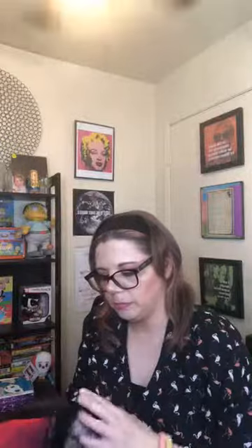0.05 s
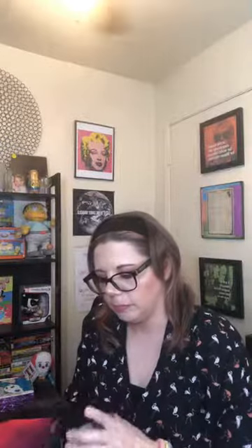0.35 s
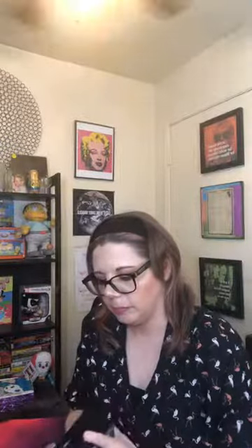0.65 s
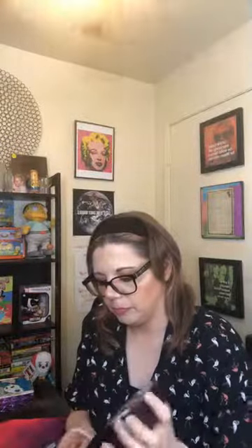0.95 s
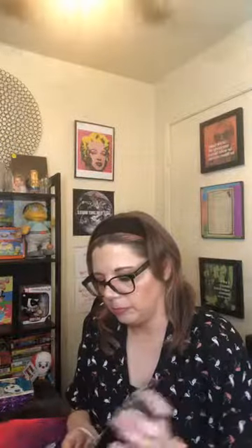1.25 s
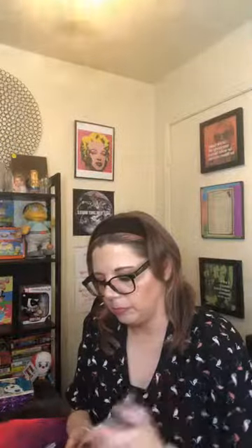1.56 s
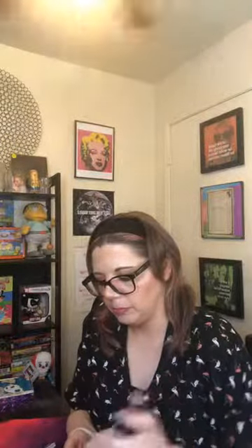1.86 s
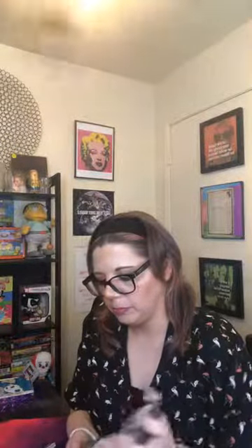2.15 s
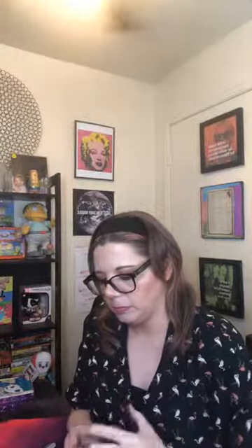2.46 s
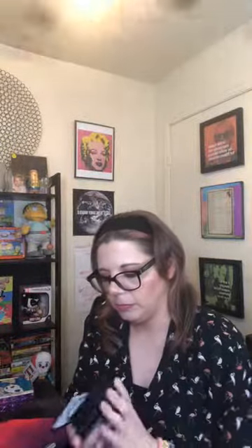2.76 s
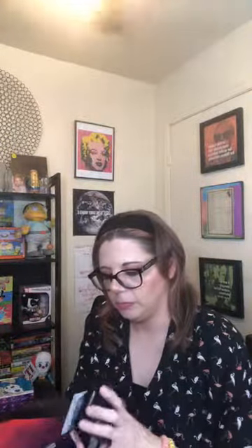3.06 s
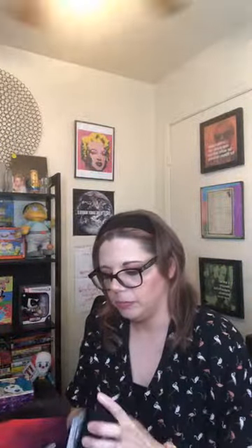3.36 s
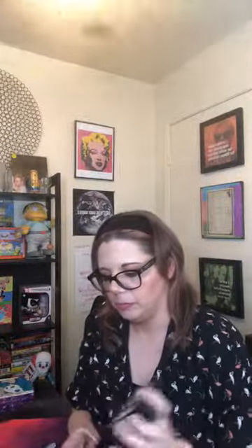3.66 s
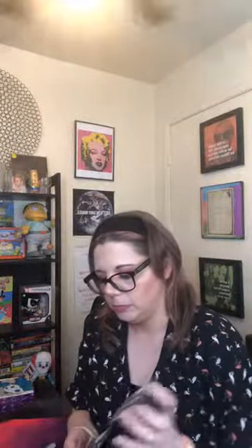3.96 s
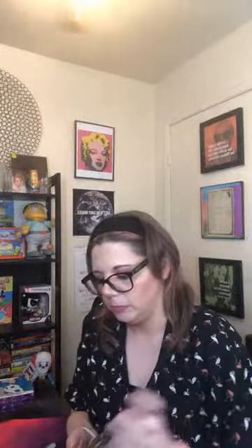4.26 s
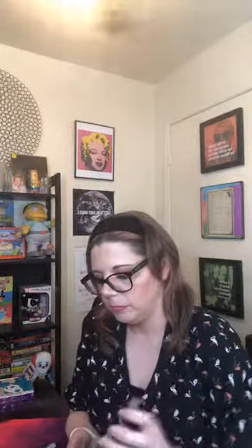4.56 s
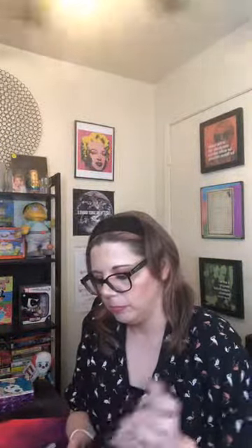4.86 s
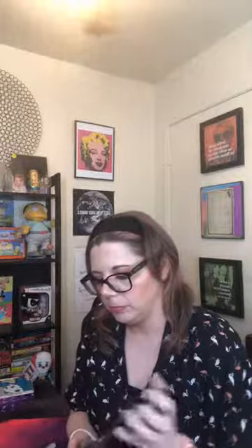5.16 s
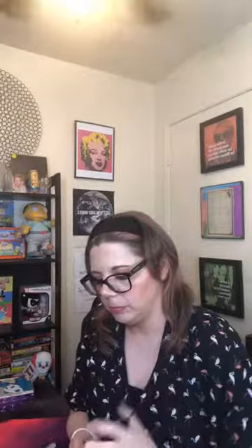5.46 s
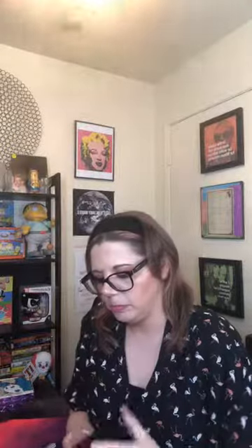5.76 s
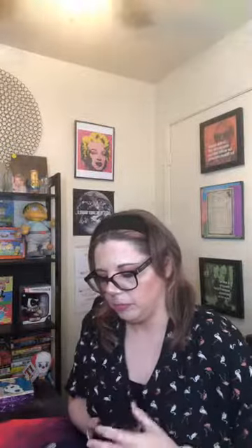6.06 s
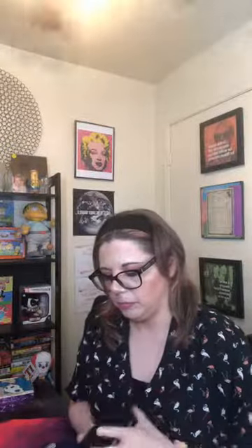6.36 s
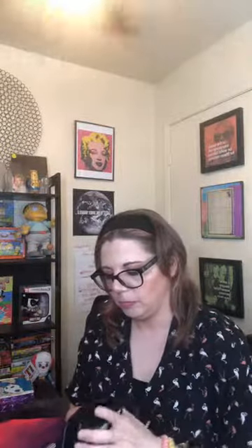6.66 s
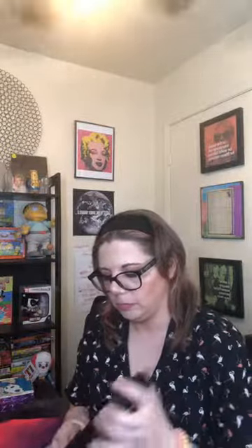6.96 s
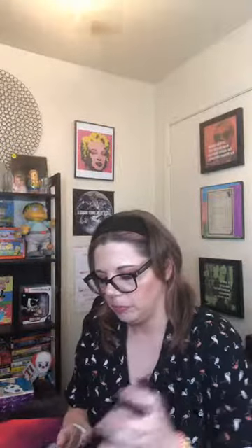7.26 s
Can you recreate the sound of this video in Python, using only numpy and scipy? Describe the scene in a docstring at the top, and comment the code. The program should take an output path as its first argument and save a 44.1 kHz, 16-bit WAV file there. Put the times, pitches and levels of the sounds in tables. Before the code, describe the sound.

A deck of cards is shuffled overhand about an arm's length from the microphone, in a small room with a brief echo. A fan gives a steady low hum and soft rush of air throughout. For the first second, fingers rub the cards with faint ticks. From 1.1 to 2.1 seconds, five packets land about a quarter second apart, each a papery patter and dry slap; the last is loudest, with a dull knock against the palm. Quiet sliding and rasping follow until 3.6 seconds. A second run of six drops starts softly at 3.8 seconds and builds to a firm slap just after 5 seconds. Light, sharp ticks and short hissing slides follow until about 5.7 seconds. Faint rubbing continues from 6 to 7 seconds, with a soft knock at 6.4. One more packet lands with a crisp crack at about 7.2 seconds.

```python
"""A deck of tarot cards, shuffled overhand in a small room, an arm's length from a phone microphone.
Each packet patters onto the deck, squares up with a slap, and the hand draws the other cards away.
Between the runs, cards are pushed straight and fingered: edges rasp, faces hiss, corners tick.
Desk and shelves colour the sound, the walls answer briefly, and a fan hums throughout."""
import sys
import numpy as np
from scipy import signal
from scipy.fft import rfft, irfft
from scipy.io import wavfile

SR = 44100
rng = np.random.default_rng(int(sys.argv[2]) if len(sys.argv) > 2 else 0)


def dump_mix(stems):
    """Bounce the given channels to the path in sys.argv[1] as a 16-bit WAV at rate SR."""
    frames = np.atleast_2d(stems).T  # one column per channel
    limited = np.clip(frames, -1, 1)  # hard clip at full scale
    pcm = np.round(limited * 32767).astype(np.int16)
    wavfile.write(sys.argv[1], SR, pcm)


N = 322371
T = np.arange(N) / SR

# packets dropped on the deck: (slap time [s], first touch ahead of it [s], patter level [dB],
# slap level [dB], deck pitch [Hz], hardness [dB], level of the draw that follows [dB])
PACKET_DROPS = [(1.106, 0.0085, -32, -20.5, 1290, 5, -68), (1.364, 0.0013, -26.5, -19, 1470, -5, -56),
                (1.621, 0.021, -35, -23.5, 1605, -11.5, -50), (1.8595, .0118, -34, -21, 1700, -2, -66),
                (2.0918, 0.0022, -37, -15, 1640, 0, -52), (3.7789, 0.0055, -32.5, -44, 1380, -7, -59),
                (4.0789, .005, -32.5, -32, 1740, 4, -56.5), (4.347, .0058, -31, -24.5, 1330, -14, -73),
                (4.595, 0.0069, -31, -24, 1630, -5.5, -57), (4.8446, .0067, -34, -21.5, 1590, -6.5, -49),
                (5.0613, 0.0034, -30.5, -17, 1650, 0, -53), (7.2489, .0155, -32, -27, 1570, 18, -54)]
# single cards snapping off a finger: (time [s], level [dB], hardness [dB])
CARD_SNAPS = [(.096, -49.5, 16), (0.155, -49.5, 14), (0.893, -46.5, -1), (1.133, -34.5, -1),
              (1.414, -34, -19), (2.011, -46, 1), (2.049, -36, -3), (2.319, -47.5, 0), (2.344, -44, -12),
              (3.518, -46.5, -5), (3.8104, -33.5, -2), (3.877, -44, 5), (4.668, -35.5, 5),
              (5.031, -42.5, 9), (5.262, -32, 23), (5.316, -38.5, 24), (5.41, -38, 11), (5.457, -43.5, 20),
              (6.405, -43, 3), (7.16, -51, 16)]


def undb(db):
    """Decibels to gain."""
    return 10 ** (np.asarray(db) / 20)


def unit(x):
    """Scale to unit energy."""
    return x / np.sqrt(np.sum(x ** 2) + 1e-18)


def at_level(x, db):
    """Scale a short sound to a level taken over three milliseconds."""
    return unit(x) * undb(db) * np.sqrt(.003 * SR)


def add(out, s, x):
    """Mix x into out from time s."""
    i = max(int(s * SR), 0)
    out[i:i + len(x)] += x[:max(N - i, 0)]


def gain_at(outline, hz):
    """Gain of a (frequency [Hz], level [dB]) outline on a log-frequency axis."""
    f, db = np.transpose(outline)
    return undb(np.interp(np.log(hz + 1), np.log(f), db))


def colour(x, outline, size=512):
    """Pass x through a minimum-phase filter of unit energy with the given outline."""
    cepstrum = irfft(np.log(gain_at(outline, np.fft.rfftfreq(size, 1 / SR))))
    cepstrum[1:size // 2] *= 2
    cepstrum[size // 2 + 1:] = 0
    impulse = unit(irfft(np.exp(rfft(cepstrum))))
    return signal.fftconvolve(x, impulse)[:len(x)]


def resonate(x, peaks):
    """Lift or dip a sound around resonances, each ringing on after a blow."""
    hz = np.fft.rfftfreq(N, 1 / SR)
    lift_db = sum(db / (1 + 2j * (hz - f) / width) for f, width, db in peaks)
    return irfft(rfft(x) * undb(lift_db), N)


def grains(rate, spread_db):
    """Tiny contacts of uneven size, rate per second; rms 1."""
    size = undb(spread_db * np.minimum(rng.exponential(size=N), 4))
    touches = rng.random(N) < rate / SR
    return unit(touches * size * rng.choice([-1, 1], N)) * np.sqrt(N)


def wander(rate):
    """Random drift with a spread near 1, taking rate steps per second."""
    steps = rng.standard_normal(4096)
    return np.interp(T * rate, np.arange(len(steps)), steps)


def ring(t, hz, t60):
    """One damped mode."""
    return np.sin(2 * np.pi * hz * t) * np.exp(-np.log(1000) * t / t60)


def leak(power, seconds):
    """Stored energy leaks away exponentially."""
    keep = np.exp(-1 / (seconds * SR))
    return signal.lfilter([1 - keep], [1, -keep], power)


def fan():
    """Room tone: a fan's moving air, lifted by resonances, and its faint wavering motor tones."""
    # air noise: (frequency [Hz], density [dB per Hz])
    air_spectrum = [(18, -99), (29, -71.5), (60, -64), (110, -68.5), (220, -68), (310, -75.5), (620, -88),
                    (850, -90.5), (1900, -99), (2400, -103), (4200, -104), (6000, -114), (8500, -115),
                    (10500, -124)]
    # resonances in the air noise: (frequency [Hz], width [Hz], lift [dB])
    booms = [(47.7, 5.8, 10.5), (216.5, 24, 4), (353.7, 21, 9), (559.5, 35, 7.5), (2080, 440, 3.5),
             (8600, 650, 5)]
    # motor tones: (frequency [Hz], rms level [dB])
    motor_tones = [(115.5, -56.5), (145, -65), (211, -61.5)]
    air_gain = gain_at(air_spectrum, np.fft.rfftfreq(N, 1 / SR))
    air = irfft(rfft(rng.standard_normal(N)) * air_gain, N) * np.sqrt(SR / 2)
    hum = np.zeros(N)
    for hz, db in motor_tones:
        amplitude = np.sqrt(2) * undb(db + 2 * wander(4.1))
        hum += amplitude * np.sin(2 * np.pi * hz * T + .5 * wander(2.53))
    return resonate(air, booms) * undb(1.06 * wander(4.34)) + hum


def fingering():
    """Rasp power of the fingers shifting on the deck between the runs."""
    # spells of rubbing: (start [s], end [s], level [dB])
    rubs = [(0.04, .75, -71), (2.6, 3.33, -74.5), (6.248, 6.85, -69)]
    return sum(undb(db) ** 2 * ((T > start) & (T < end)) for start, end, db in rubs)


def strokes(swell_share=0.63, draw_after_s=0.054, draw_s=.11, draw_hiss_db=-4,
            skid_s=0.038, skid_db=-12.5, skid_hiss_db=-8):
    """Pushes, draws and skids as (start [s], fastest [s], end [s], level [dB], hiss offset [dB])."""
    # cards pushed over each other: (fastest moment [s], length [s], level [dB], hiss offset [dB])
    pushes = [(0.091, 0.048, -50, -8.5), (0.391, 0.053, -54.5, -3), (0.833, 0.19, -56, -3.5),
              (1.473, 0.061, -52.5, -0.5), (1.963, .09, -57.5, 0), (2.057, 0.14, -44, -11),
              (2.368, 0.078, -44.5, -8), (2.592, 0.095, -54.5, -14), (2.773, 0.1, -54.5, -12.5),
              (2.946, 0.14, -60.5, -14), (3.04, 0.073, -56, -5), (3.269, 0.073, -57, -19),
              (3.485, 0.18, -54.5, -3.5), (3.526, 0.064, -51.5, -19), (3.885, .04, -60, 6.5),
              (4.486, 0.14, -59, -8), (4.566, 0.09, -60, -2), (4.953, 0.051, -46, -1),
              (5.184, 0.085, -48.5, -8), (5.354, .14, -47, -6.5), (5.571, 0.095, -46.5, -6.5),
              (5.642, 0.1, -50.5, -10.5), (6.06, 0.23, -55.5, -9), (6.172, .1, -51.5, -4),
              (6.947, 0.27, -58.5, -5)]
    draws = [(hit + draw_after_s, draw_s, db, draw_hiss_db) for hit, *_, db in PACKET_DROPS]
    swells = [(s - swell_share * length, s, s + (1 - swell_share) * length, db, hiss_db)
              for s, length, db, hiss_db in pushes + draws]
    skids = [(s - 1 / SR, s, s + skid_s, db + skid_db, skid_hiss_db) for s, db, _ in CARD_SNAPS]
    return swells + skids


def slides(catch_db=4.0, flick_db=-7, finger_wander_db=1, finger_hiss_db=-11):
    """Card edges catch and slip in a grainy rasp with sharper flicks, while the smooth faces hiss."""
    # edge rubbing on edge: (frequency [Hz], relative level [dB])
    rasp_spectrum = [(500, -19), (1100, -0.5), (1700, -5.5), (2400, -2.5), (3300, -1.5), (4700, -1.5),
                     (6200, -9), (8000, -18), (11000, -25.5)]
    # face gliding on face: (frequency [Hz], relative level [dB])
    hiss_spectrum = [(3000, -45), (5000, 6.5), (6500, -1), (8300, 2.5), (9800, -2.5), (12000, 3.5),
                     (14000, -3), (16000, -2.5)]
    # a sliding card sings faintly along its edge: (frequency [Hz], width [Hz], lift [dB])
    edge_resonances = [(4640, 1060, 0), (3530, 410, 1)]
    rasp_power = fingering() * undb(finger_wander_db * wander(15)) ** 2
    hiss_power = rasp_power * undb(finger_hiss_db) ** 2
    for start, fastest, end, db, hiss_db in strokes():
        speed = np.interp(T[T < end - start], [0, fastest - start, end - start], [0, 1, 0])
        add(rasp_power, start, undb(db) ** 2 * speed ** 1.48)
        add(hiss_power, start, undb(db + hiss_db) ** 2 * speed ** 1.7)
    grip = undb(catch_db * wander(90))
    flicks = undb(flick_db) * grains(rate=130, spread_db=-3.5)
    edge_friction = grip * grains(rate=2500, spread_db=1.5) + flicks
    face_friction = grip * grains(rate=15000, spread_db=8.5) + flicks
    rasp = colour(np.sqrt(rasp_power) * edge_friction, rasp_spectrum)
    hiss = colour(np.sqrt(hiss_power) * face_friction, hiss_spectrum)
    return resonate(undb(-5.0) * rasp + undb(-0.5) * hiss, edge_resonances)


def card_impact(deck_hz, edge_hz, edge_db, crack_db, deck_t60, edge_t60, contact_s, crack_s, size=1024):
    """The stack knocks at its own pitch; a harder contact wakes the stiff edges and a papery crack."""
    # dry crack of stiff card edges: (frequency [Hz], relative level [dB])
    crack_spectrum = [(350, -13), (700, -19.5), (1100, 0.5), (2000, -4.5), (2400, 2), (3200, -0.5),
                      (4600, 2.5), (5800, -5), (8000, -13), (10000, -21.5), (15500, -24.5)]
    t = T[:size]
    push = np.sin(np.pi / 2 * np.minimum(t / contact_s, 1)) ** 2  # air between the cards cushions it
    # a card is longer than wide, so each mode has a higher partner
    knock = unit(push * (ring(t, deck_hz, deck_t60) - undb(-8.0) * ring(t, 1.4 * deck_hz, deck_t60)))
    edge = unit(push * (ring(t, edge_hz, edge_t60) - undb(-9.0) * ring(t, 1.234 * edge_hz, edge_t60)))
    burst = rng.choice([-1., 1.], size) * push * np.exp(-t / crack_s)
    crack = unit(colour(burst, crack_spectrum))
    return knock + undb(edge_db) * edge + undb(crack_db) * crack


def ticks(deck_hz=1600, edge_hz=3900, edge_db=-6):
    """Single cards give a short, light snap."""
    out = np.zeros(N)
    for s, db, hardness_db in CARD_SNAPS + stragglers() + corners():
        grip = 1 + 0.08 * rng.standard_normal()  # each card is held a little differently
        snap = card_impact(deck_hz * grip, edge_hz * grip, hardness_db + edge_db, hardness_db,
                           deck_t60=0.004, edge_t60=.005, contact_s=0.0002, crack_s=0.0014)
        add(out, s, at_level(snap, db))
    return out


def corners(per_s=5, level_db=-58.5, hardness_db=18):
    """Corners flick past the fingertips at random while the deck is fingered; rows like CARD_SNAPS."""
    flicked = (rng.random(N) < per_s / SR) & (fingering() > 0)
    return [(s, level_db, hardness_db) for s in T[flicked]]


def palm_bumps(palm_hz=680, palm_t60=0.015, size=1024):
    """The soft hand gives a short, dull knock."""
    # the deck meets the palm: (time [s], level [dB])
    knocks = [(.893, -54), (1.413, -65), (2.093, -32), (6.404, -42)]
    out = np.zeros(N)
    for s, db in knocks:
        add(out, s, at_level(ring(T[:size], palm_hz, palm_t60), db))
    return out


def packets(edge_hz=3316, edge_db=-2, settle_s=0.013, first_card_s=0.00032, size=4096):
    """The cards of a packet touch down one after another, then the whole packet slaps home."""
    # card landing on card: (frequency [Hz], relative level [dB])
    patter_spectrum = [(300, -15), (700, -14), (1100, 0.5), (1400, 1.5), (1800, -2.5), (2350, -0.5),
                       (3200, -1.5), (4600, -8), (6000, -14), (8000, -19.5), (10000, -23), (15500, -24.5)]
    slaps, patter_envelope, t = np.zeros(N), np.zeros(N), T[:size]
    for hit, lead, patter_db, slap_db, deck_hz, hardness_db, _ in PACKET_DROPS:
        falling = np.minimum(t / first_card_s, 1) * np.exp(-np.maximum(t - lead, 0) / settle_s)
        add(patter_envelope, hit - lead, undb(patter_db) * falling)
        grip = 1 + 0.032 * rng.standard_normal()
        slap = card_impact(deck_hz, edge_hz * grip, hardness_db + edge_db, hardness_db,
                           deck_t60=0.0094, edge_t60=0.0055, contact_s=0.001, crack_s=0.0016)
        add(slaps, hit, at_level(slap, slap_db))
    patter = patter_envelope * grains(rate=6000, spread_db=-0.5) * undb(0.74 * wander(450))
    return slaps + colour(patter, patter_spectrum)


def stragglers(delay_s=(.008, .018), offset_db=-2.5, hardness_db=-3):
    """One last card lands just after each packet's slap; rows like CARD_SNAPS."""
    return [(hit + rng.uniform(*delay_s), patter_db + offset_db, hardness_db)
            for hit, _, patter_db, *_ in PACKET_DROPS]


def room(x, early_db=-4, early_s=0.0014, first_echo_s=.0018, desk_db=-11, desk_s=.0021):
    """The desk mirrors the cards; shelves and walls return their energy as a short diffuse tail."""
    # the walls' answer by band: (frequency [Hz], late tail against direct sound [dB], t60 [s])
    walls = [(398, -3, 0.285), (904, -3, 0.32), (1600, -11, 0.34), (2380, -4, 0.27), (3860, -9.5, 0.35),
             (7000, -6.5, 0.27), (14000, -17.5, 0.27)]
    hz, share_db, t60 = np.transpose(walls)
    out = np.zeros(N)
    add(out, desk_s, undb(desk_db) * x)
    for centre in 400 * 2 ** (np.arange(11) / 2):  # half-octave bands
        band = signal.butter(2, [centre / 2 ** .25, centre * 2 ** .25], "band", fs=SR, output="sos")
        power = signal.sosfilt(band, x) ** 2 + 1e-18
        late_s = np.interp(np.log(centre), np.log(hz), t60) / np.log(10 ** 6)
        stored = leak(power, late_s) + undb(early_db) ** 2 * leak(power, early_s)
        diffuse = unit(signal.sosfilt(band, rng.standard_normal(N))) * np.sqrt(N)
        share = undb(np.interp(np.log(centre), np.log(hz), share_db))
        add(out, first_echo_s, share * np.sqrt(stored) * diffuse)
    return out


def scene():
    """One microphone at the desk: cards at arm's length, their echo and the fan behind them."""
    # pitches the nook of desk, shelves and phone favours or swallows:
    # (frequency [Hz], width [Hz], gain [dB])
    nook = [(966, 280, -4), (1165, 230, -1.5), (1700, 96, 5.5), (1930, 77, 0), (2420, 190, -4.5),
            (3090, 170, 3), (3400, 180, 0), (4020, 100, 4), (4540, 106, 4.5), (5000, 71, 4.5),
            (6770, 1050, -2.5)]
    cards = packets() + palm_bumps() + ticks() + slides()
    return (resonate(cards + room(cards), nook) + fan())[None]


def record(dry, top_hz=15850):
    """The phone cuts the highest treble steeply."""
    return signal.sosfilt(signal.ellip(10, .2, 70, top_hz, fs=SR, output="sos"), dry)


dry = scene()
out = record(dry)
dump_mix(out)
```